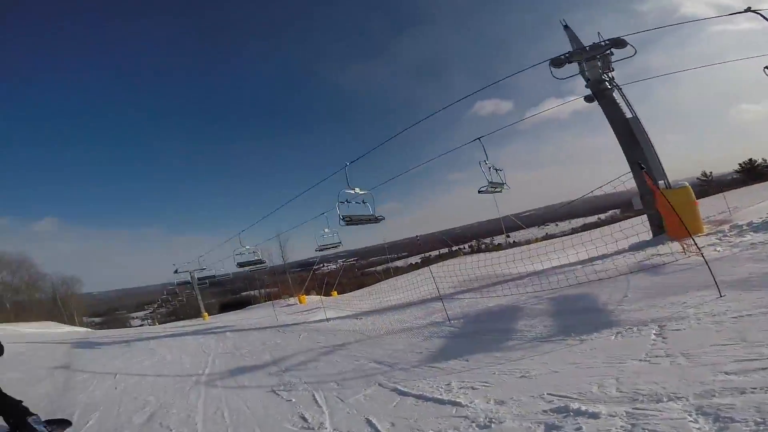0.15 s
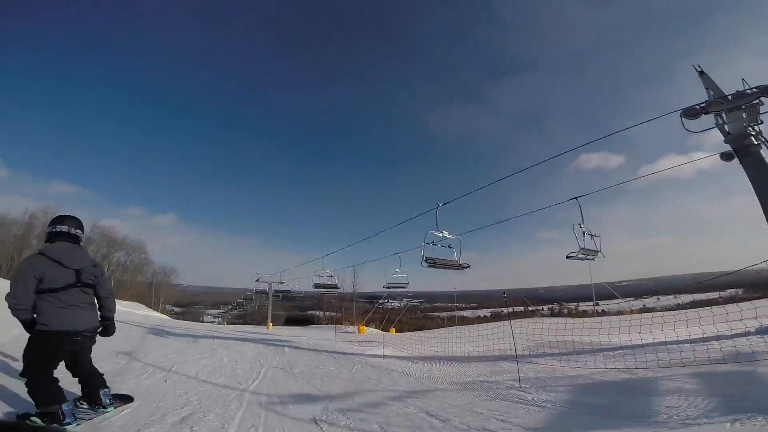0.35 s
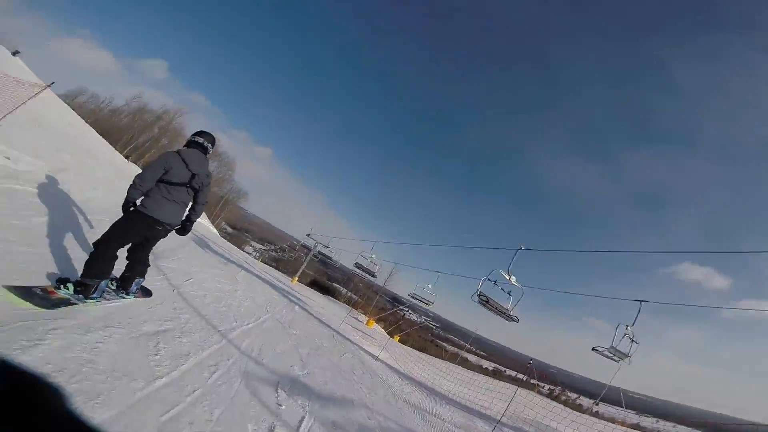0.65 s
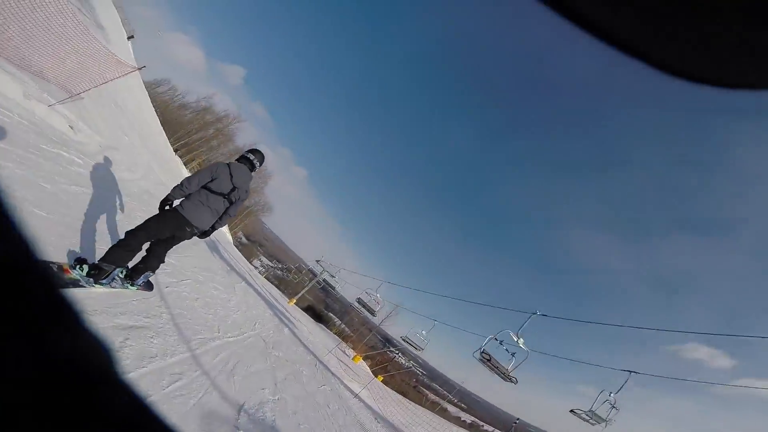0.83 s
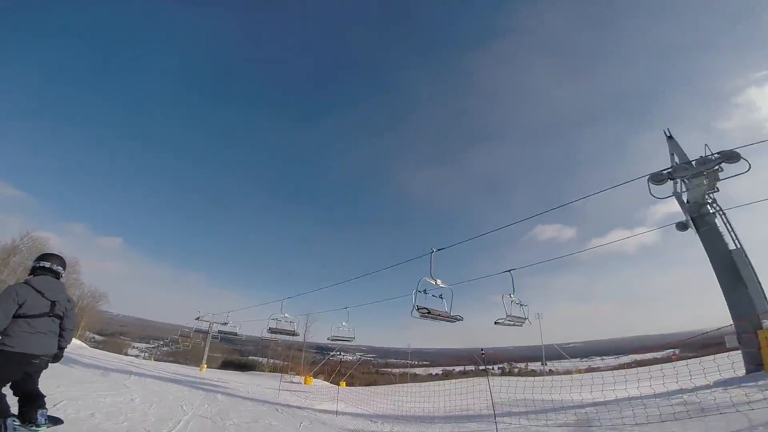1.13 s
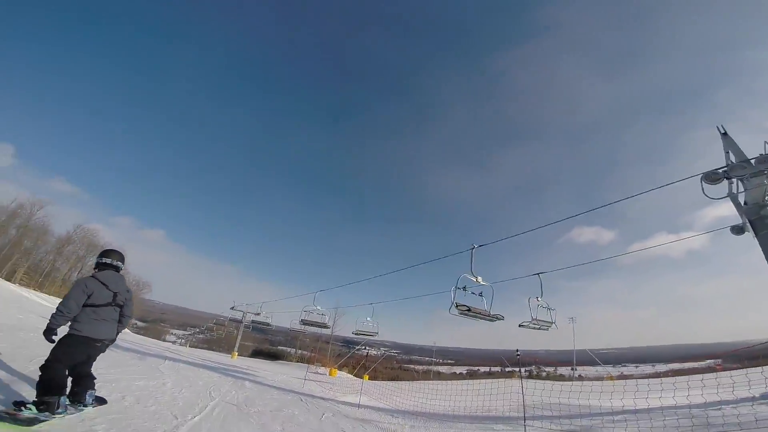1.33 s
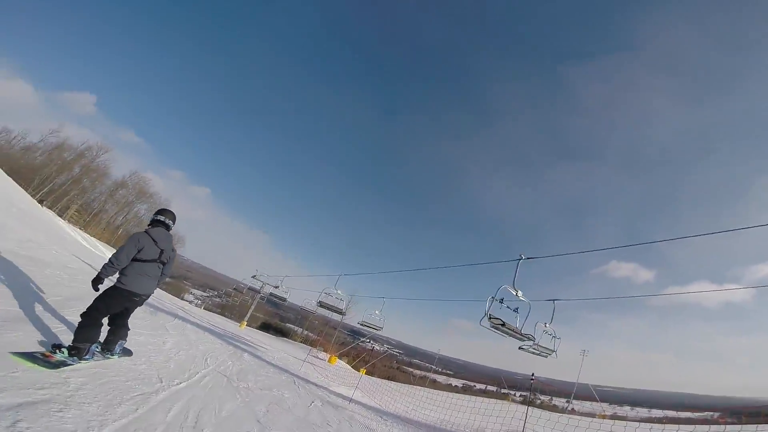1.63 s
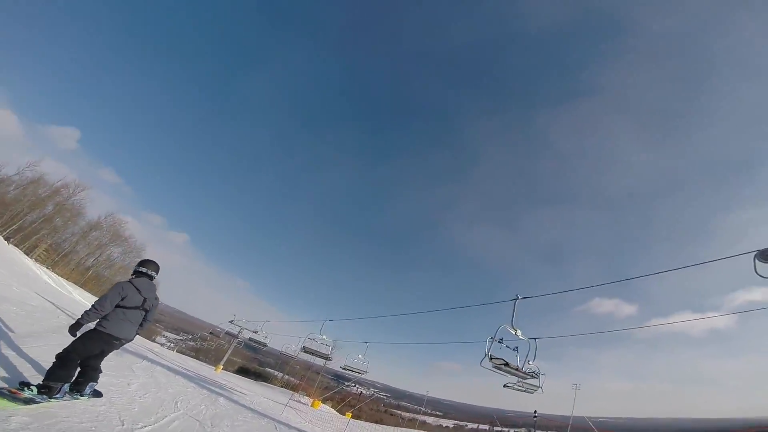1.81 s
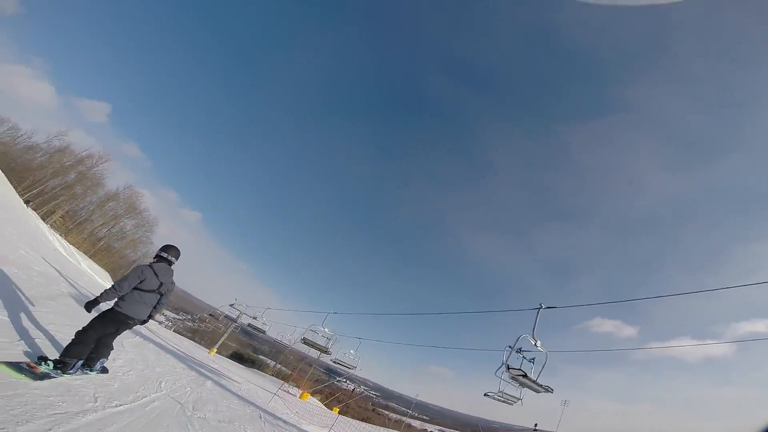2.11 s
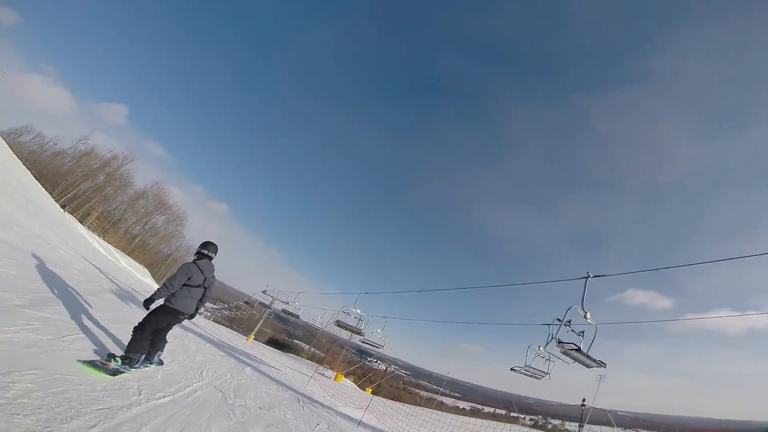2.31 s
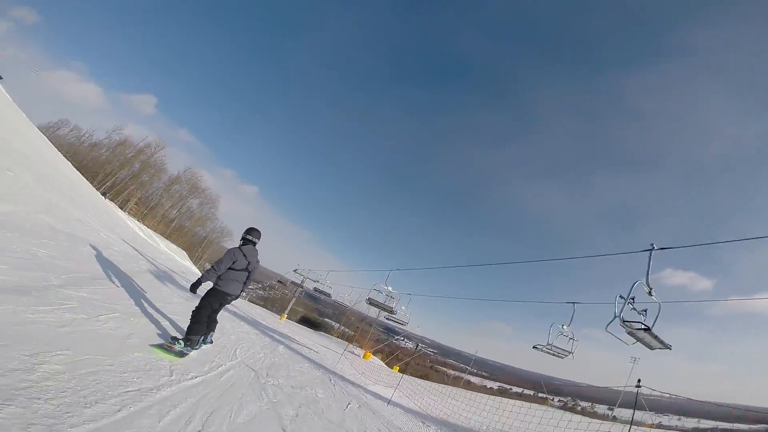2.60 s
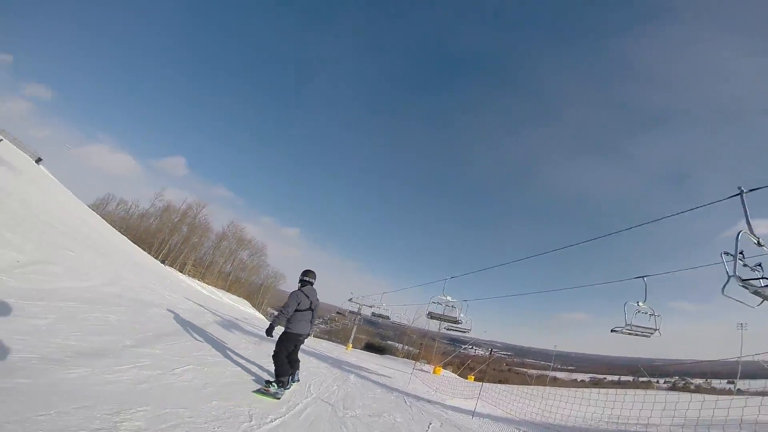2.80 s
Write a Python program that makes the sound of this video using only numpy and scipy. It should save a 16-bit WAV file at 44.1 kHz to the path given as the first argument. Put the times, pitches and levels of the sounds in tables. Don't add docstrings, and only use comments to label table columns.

```python
import sys
import numpy as np
from scipy import signal
from scipy.fft import rfft, irfft, next_fast_len
from scipy.io import wavfile
from scipy.ndimage import uniform_filter1d, map_coordinates

SR = 44100
rng = np.random.default_rng(int(sys.argv[2]) if len(sys.argv) > 2 else 0)


def level_to_linear(level):
    exponent = np.asarray(level, float) / 20
    return 10 ** exponent


def master(y):
    cut = np.clip(np.atleast_2d(y).T, -1, 1)
    pcm = np.round(cut * 32767)
    wavfile.write(sys.argv[1], SR, pcm.astype(np.int16))


N = 130095

# (time [s], rumble level [dB])
GUSTS = [(0.0, -47), (0.34, -44), (0.38, -46.5), (0.8, -47), (0.93, -50.5), (1.07, -38), (1.23, -40),
         (1.4, -36), (1.62, -42), (1.8, -37), (1.93, -41), (2.0, -33.5), (2.29, -30.5), (2.45, -40),
         (2.56, -31.5), (2.66, -41), (2.84, -40.5), (2.95, -29.5)]


def unit(x):
    return x / np.sqrt(np.mean(x ** 2) + 1e-20)


def wobble(rate):
    points = rng.standard_normal(int(N * rate / SR) + 4)
    return map_coordinates(points, [np.arange(N) * rate / SR])


def filtered(x, response):
    m = next_fast_len(N + SR // 2)
    return irfft(rfft(x, m) * response(np.fft.rfftfreq(m, 1 / SR)), m)[..., :N]


def rung(x, modes):
    def response(f):
        total = 0
        for k, (centre, width, db) in enumerate(modes):
            damping = 1j * f * width
            ring = damping / (centre * centre - f * f + damping)
            total = total + (-1) ** k * level_to_linear(db) * ring
        return total
    return filtered(x, response)


def case(body, shell, belly):
    # (centre [Hz], width [Hz], level [dB])
    body_modes = [(1596, 147, -8.5), (1936, 203, -3.5), (2283, 178, 0), (2602, 268, -1.5), (3274, 724, -9),
                  (3705, 660, -9.5)]
    shell_modes = [(5635, 590, -18), (6770, 990, -12), (7080, 1410, -15), (10260, 540, -25),
                   (12000, 16000, -32.5)]
    belly_modes = [(315, 380, -16.5), (913, 214, -11.5), (1390, 260, -14.5)]
    return rung(body, body_modes) + rung(shell, shell_modes) + rung(belly, belly_modes)


def patchy():
    patch_db = 2.5
    z = signal.stft(rng.standard_normal(N), nperseg=256)[2]
    field = rng.standard_normal(z.shape)
    field = uniform_filter1d(uniform_filter1d(field, 5, 0), 5, 1)
    return unit(signal.istft(z * level_to_linear(patch_db * unit(field)), nperseg=256)[1][:N])


def rumble():
    # (frequency [Hz], level [dB])
    rumble_slope = [(20, 4.5), (60, -3), (120, -6.5), (250, -14.5), (600, -30.5), (1500, -43)]
    f, db = np.transpose(rumble_slope)

    def response(hz):
        return (hz > 15) * level_to_linear(np.interp(np.log(hz + 1), np.log(f), db))
    return unit(filtered(rng.standard_normal(N), response))


def wind():
    hiss_db = -47
    s, db = np.transpose(GUSTS)
    lumps = unit(level_to_linear(5.7 * wobble(24.11)) * rumble())
    hiss = unit(case(patchy(), 1.4 * patchy(), patchy()))
    gust = level_to_linear(np.interp(np.arange(N) / SR, s, db))
    return gust * lumps + level_to_linear(hiss_db + 3.4 * wobble(28.5)) * hiss


def scrape():
    # (start [s], length [s], start level [dB], end level [dB],
    # brightness [dB])
    rub_strokes = [(0.006, 0.025, -39.5, -39, 9), (0.033, 0.15, -43, -47, 10),
                   (0.081, 0.03, -56, -32, -20), (0.186, 0.096, -26.5, -44, 0.5),
                   (0.3012, .033, -11.5, -15, 9), (0.345, 0.065, -42.5, -48, 4),
                   (0.412, 0.043, -41, -35, 6.5), (0.465, 0.036, -25, -35.5, 3),
                   (0.503, 0.07, -39.5, -29.5, -1.5), (0.585, 0.088, -33, -24, 8),
                   (0.669, 0.064, -31.5, -17.5, 4.5), (0.734, 0.039, -21, -29, 2.5),
                   (0.763, 0.059, -20.5, -18, 5.5), (0.822, 0.019, -25, -24, 0),
                   (0.847, 0.034, -35.5, -35.5, -0.5), (0.965, 0.1263, -42.5, -26, 3.5),
                   (1.089, 0.093, -28.5, -32, 1), (1.237, 0.083, -31.5, -18, 3),
                   (1.34, 0.047, -36.5, -28, 0.5), (1.39, 0.057, -25.5, -26, 6),
                   (1.45, 0.03, -27.5, -28.5, 4), (1.495, 0.05, -24.5, -26, 2.5),
                   (1.554, 0.0055, -20, -23.5, 8), (1.564, 0.12, -35, -34.5, 4),
                   (1.672, 0.07, -27, -28, 4), (1.761, 0.027, -26, -30.5, -7),
                   (1.794, 0.22, -36.5, -36.5, -12), (1.945, 0.033, -33, -32.5, 0),
                   (1.981, 0.012, -25.5, -26.5, 7), (2.001, 0.027, -28, -25.5, 4),
                   (2.047, 0.074, -39, -31.5, -1.5), (2.129, 0.044, -25, -25, -0.5),
                   (2.181, 0.078, -42.5, -42, -2), (2.25, 0.025, -29.5, -36, -7),
                   (2.269, 0.008, -23, -29, -8), (2.28, 0.012, -28, -38.5, 2),
                   (2.309, 0.043, -39, -47, -1), (2.345, 0.032, -39.5, -32, 1.5),
                   (2.378, 0.021, -27, -27, 5.5), (2.409, 0.081, -44.5, -47.5, -11),
                   (2.497, 0.031, -36, -31.5, -2), (2.538, 0.01, -29, -33.5, -2),
                   (2.559, 0.06, -36.5, -38, -4), (2.607, 0.024, -26, -37, 1.5),
                   (2.646, 0.115, -66, -30.5, 1), (2.761, 0.038, -30, -35, -1),
                   (2.809, 0.17, -50, -29.5, -2.9)]
    rise_s, swell_s, edge_s = .003, .014, .005
    grit_per_s, grit_spread_db, grit_life_s = 600, 4, .0007
    grit_share = .4
    flutter_db, crunch_db, packed_db = 2.5, 2, -17
    drag_db, deepen = -6.5, 0.24

    u = np.arange(SR // 5) / SR
    power = np.zeros((2, N + SR))
    for s, length, db0, db1, bright_db in rub_strokes:
        stroke = level_to_linear(db0 + (db1 - db0) * np.clip(u / length, 0, 1))
        stroke *= np.clip(u / (swell_s if db1 > db0 else rise_s), 0, 1)
        stroke *= np.exp(-np.maximum(u - length, 0) / edge_s)
        power[:, round(s * SR):][:, :len(u)] += (stroke * level_to_linear(np.array([[0], [bright_db]]))) ** 2
    press, bright = np.sqrt(power[:, :N])

    chance, size = rng.random(N), rng.exponential(size=N)
    crumbs = (chance < grit_per_s / SR) * level_to_linear(grit_spread_db * np.minimum(size, 3))
    grit = np.abs(filtered(crumbs, lambda f: 1 / (1 + 2j * np.pi * f * grit_life_s)))
    grain = np.sqrt(grit_share * unit(grit) ** 2 + 1 - grit_share) * level_to_linear(flutter_db * wobble(70))
    packing = press / level_to_linear(packed_db)
    grain = unit(grain) ** np.clip(1 - packing, .1, 1)
    clicks = unit(crumbs * rng.standard_normal(N))
    crunch = level_to_linear(crunch_db) * grit_share * clicks * np.clip(1 - packing / 2, .1, 1)
    body = grain * patchy() + crunch
    shell = grain * patchy() + crunch
    belly = grain * patchy() + crunch
    scale = np.std(case(body, shell, belly))

    shake = level_to_linear(drag_db) * uniform_filter1d(np.minimum(press, .05), 600) * rumble()
    shake_db = np.interp(np.arange(N) / SR, *np.transpose(GUSTS))
    deep = level_to_linear(deepen * (shake_db - shake_db.mean()))
    return case(body * press, shell * bright, belly * press * deep) / scale + shake


def snaps():
    # (time [s], peak level [dB], brightness [dB], depth [dB])
    case_snaps = [(0.01, -19.5, -10, -40), (0.1147, -14, -26, -38), (0.191, -3.5, -35, -32),
                  (0.1944, -5, -49, -47), (0.1975, 3, -25, -34), (0.304, 8.5, -19, -33),
                  (0.4492, -18.5, -11, -36), (0.4654, -8, -21, -31), (0.4938, -18, -12, -36),
                  (0.514, -24.5, -2, -24), (0.5608, -9, -20, -31), (0.579, -19, -12, -26),
                  (0.5887, -11, -18, -21), (0.6023, -10, -5, -43), (0.6649, -8.5, -7.5, -36),
                  (0.811, 1.5, -17, -49), (0.8148, -13.5, 3.5, -30), (0.8315, 5, -22, -13),
                  (0.9309, -13, -5.5, -48), (1.171, -14, -8, -35), (1.197, -24.5, -6, -33),
                  (1.305, -4, -21, -19), (1.3189, -1.5, -22, -29), (1.374, -2, -43, -42),
                  (1.4025, -5.5, -13, -46), (1.4405, -1, -20, -25),
                  (1.492, -8.5, -28, -15), (1.499, -5, -18, -9.5), (1.509, -10, -17, -10),
                   (1.55, -2, -2, -47), (1.5949, -14.5, -26, -9), (1.7572, -1.5, -11, -52),
                   (1.771, -11, -22, -24), (1.782, -15, -25, -12), (1.8436, 2.5, -10, -64),
                   (1.8673, -13, -36, -11), (1.937, -6, -10.5, -18), (1.9739, -15.5, -5, -19),
                   (2.148, -5.5, -13, -25), (2.2293, -17.5, -9.5, -16), (2.252, -17, -4, -25),
                   (2.2728, -10, -20, -3.5), (2.2772, -13.5, -6, -13), (2.3045, -1, -49, -14),
                   (2.3434, -23, -8, -14), (2.401, -9, -10, -25), (2.5015, -16.5, -8.5, -30),
                   (2.5736, -12.5, -11.5, -9.5), (2.6051, -5.5, -18, -48), (2.6932, -15, -25, -24),
                   (2.7566, -3, -5, -30), (2.7696, -14, -7, -10.5), (2.7889, -11.5, -12.5, -36)]
    # (time [s], peak level [dB])
    case_ticks = [(0.0576, -10.5), (0.2653, -10), (0.382, -12), (0.413, -17), (0.4337, -13), (0.4687, -2.5),
                  (0.543, -6), (0.639, -6), (1.057, -24), (1.2206, -19), (1.256, -7), (1.379, 2), (1.493, 3),
                  (1.5135, -4), (1.7025, -2), (1.911, -12), (2.0236, 2), (2.165, -6), (2.204, -9),
                  (2.2545, -8), (2.26, -6), (2.2758, 0), (2.447, -9), (2.4522, -11), (2.5613, -8),
                  (2.578, -8.5), (2.769, -5), (2.588, -8), (2.7347, -14), (2.7435, -9)]
    # (centre [Hz], width [Hz], level [dB])
    clack_modes = [(2504, 935, 2), (2668, 194, 4.5)]
    # (centre [Hz], width [Hz], level [dB])
    tink_modes = [(5320, 1200, -15.5)]
    lead_s, lead_db = 0.0008, -19.5
    tail_s, tail_db = 0.0013, -24
    snap_gain_db, tick_gain_db, bright_gain_db, depth_gain_db = 20.5, 13, 17.5, 21
    contact_hz = 6360

    drive = np.zeros((3, N + SR))
    t = np.arange(-SR // 200, SR // 40) / SR
    crumble = rng.standard_normal((100, 3, len(t)))
    lead = np.array([[0], [1], [0]]) * level_to_linear(lead_db) * np.exp(np.minimum(t, 0) / lead_s)[None]
    tail = level_to_linear(tail_db) * np.exp(-np.maximum(t, 0) / tail_s)
    cracks = np.where(t == 0, 1, crumble * np.where(t < 0, lead, tail))
    for (s, db, bright_db, depth_db), crack in zip(case_snaps, cracks):
        colour_db = np.array([[0], [bright_db + bright_gain_db], [depth_db + depth_gain_db]])
        drive[:, round((s + t[0]) * SR):][:, :len(t)] += level_to_linear(db + snap_gain_db + colour_db) * crack
    for (s, db), crack in zip(case_ticks, cracks[::-1]):
        drive[1, round((s + t[0]) * SR):][:len(t)] += level_to_linear(db + tick_gain_db) * crack[1]
    body, shell, belly = drive[:, :N]
    body, belly = filtered(np.array([body, belly]), lambda hz: 1 / (1 + 1j * hz / contact_hz) ** 2)
    return case(0.63 * body, shell, belly) + rung(body, clack_modes) + rung(shell, tink_modes)


def jolts():
    # (time [s], peak level [dB], push length [s])
    bumps = [(0.045, -29, 0.039), (0.162, -28.5, 0.0017), (0.314, -23.5, 0.018), (0.343, -30.5, 0.027),
             (0.594, -17.5, 0.0026), (0.844, -21, 0.0055), (1.067, -26.5, 0.013), (1.317, -19, 0.0096),
             (1.675, -18, 0.023), (2.005, -16.5, 0.0086), (2.028, -25.5, 0.009), (2.145, -16, 0.012),
             (2.252, -19.5, 0.0057), (2.281, -20, 0.0056), (2.304, -21, 0.011), (2.497, -23.5, 0.0074),
             (2.543, -25.5, 0.0071), (2.573, -14, 0.006), (2.6, -19, 0.041), (2.756, -16.5, 0.00095)]
    out, t = np.zeros(N + SR), np.arange(SR // 5) / SR
    for s, db, push in bumps:
        u = t / push
        swing = np.sin(np.pi * u ** 0.43) * np.exp(-.9 * u)
        soft_start = 1 - np.exp(-(u / 0.17) ** 2)
        out[round(s * SR):][:len(t)] += level_to_linear(db) * 2.04 * swing * soft_start
    return out[:N]


def knocks():
    # (time [s], peak level [dB], hollow over wall [dB])
    blunt_blows = [(0.1982, -8, 1.5), (0.219, -17, -5), (0.236, -22, -8), (0.465, -16.5, -4),
                   (0.831, -8.5, -1), (1.348, -21, -9), (1.4615, -21, -2), (1.4885, -10, -7),
                   (1.595, -17.5, -2), (2.2979, -22, 3), (2.3992, 2.5, -5), (2.563, -18, 4.5),
                   (2.661, -32.5, 6), (2.7445, -21, 0)]
    gain_db, softness_hz = 26.5, 3340
    blows = np.zeros((2, N))
    for s, db, hollow_db in blunt_blows:
        blows[:, round(s * SR)] = level_to_linear(db + gain_db + np.array([0, hollow_db]))
    wall, hollow = filtered(blows, lambda hz: 1 / (1 + 1j * hz / softness_hz) ** 2)
    return rung(wall, [(2160, 310, 0)]) + rung(hollow, [(994, 136, 0)])


def slips():
    # (time [s], strain level [dB], build-up [s], tock level [dB])
    releases = [
        (2.6936, -20, 0.027, -10),
    ]
    tock_s, settle_s = 0.00017, 0.091
    out = np.zeros(N)
    for s, db, build, tock_db in releases:
        t = np.arange(N) / SR - s
        pull = -np.exp(-np.abs(t) / build)
        overshoot = 0.55 * np.exp(-np.abs(t) / settle_s)
        strain = np.where(t < 0, pull, overshoot)
        tock = level_to_linear(tock_db) * np.exp(-(t / tock_s) ** 2)
        out += level_to_linear(db) * uniform_filter1d(strain, size=40) - tock
    return out


def scene():
    return (scrape() + snaps() + knocks() + slips() + jolts() + wind())[None]


def roll_off(x):
    return signal.sosfilt(signal.butter(12, 16540, fs=SR, output="sos"), x)


def record(dry):
    low_hz, foam_hz, top_hz = 23.8, 8500, 14700
    clip = 1.0
    x = dry / (1 + np.abs(dry / clip) ** 6) ** (1 / 6)

    def response(hz):
        low_cut = 1j * hz / (low_hz + 1j * hz)
        muffled = low_cut / (1 + 1j * hz / foam_hz) ** 2
        return muffled / (1 + (hz / top_hz) ** 30)
    return roll_off(filtered(x, response))


dry = scene()
out = record(dry)
master(out)
```